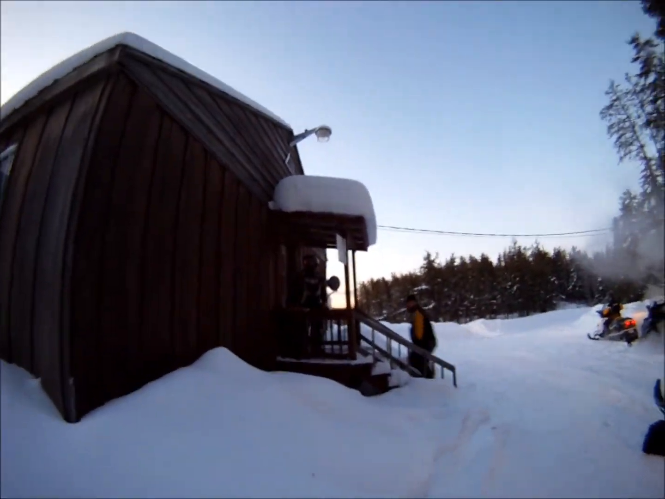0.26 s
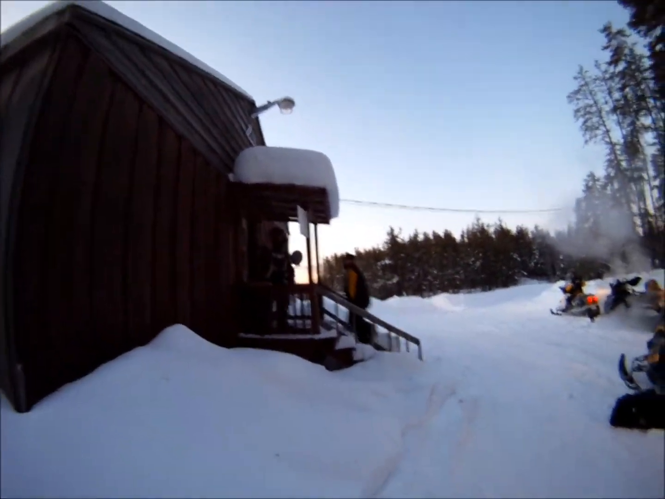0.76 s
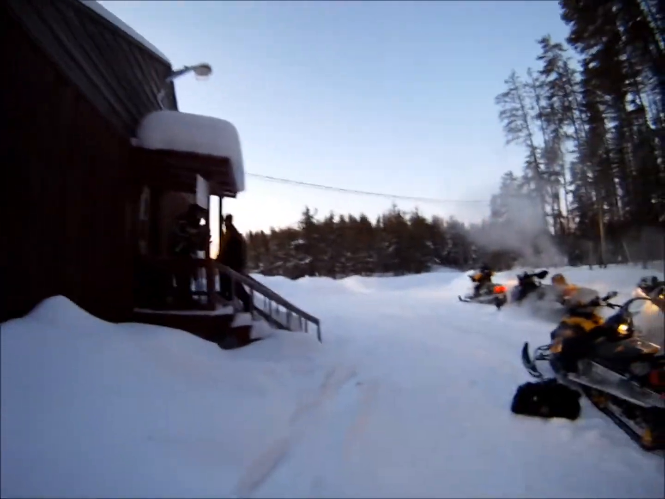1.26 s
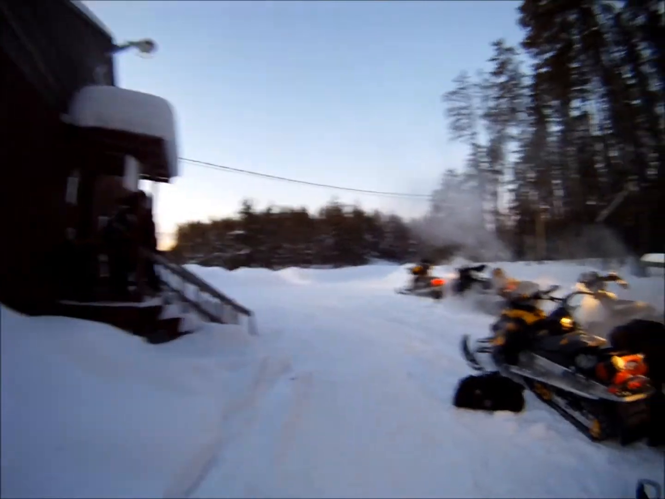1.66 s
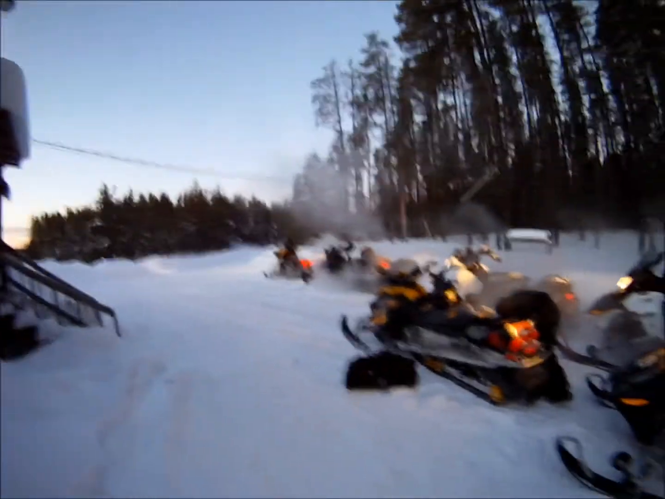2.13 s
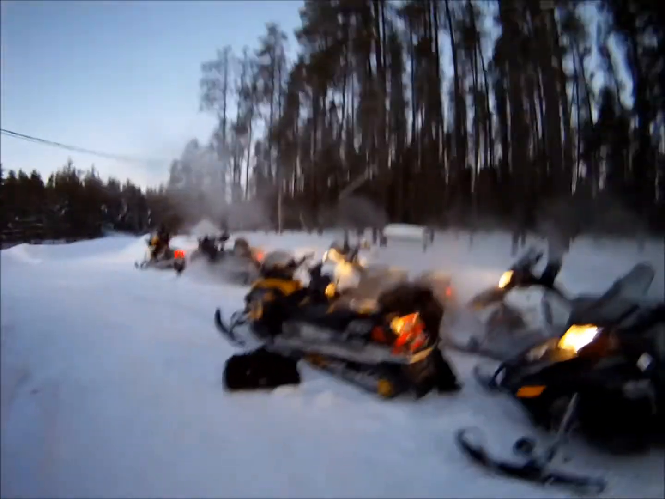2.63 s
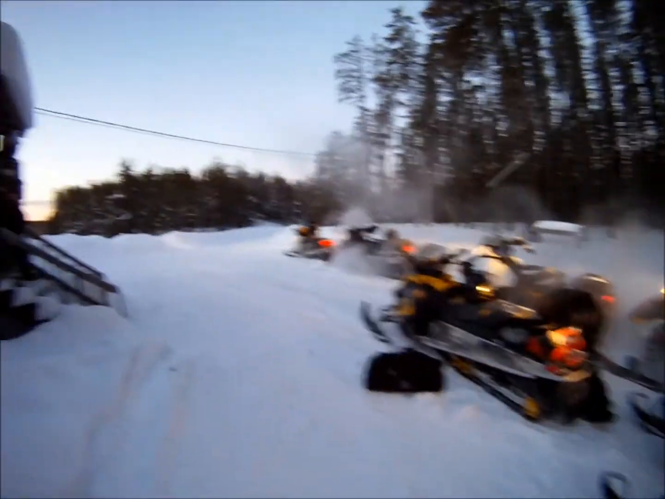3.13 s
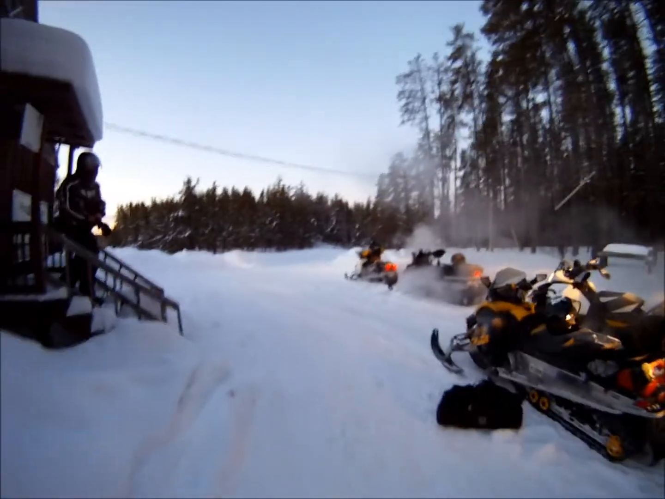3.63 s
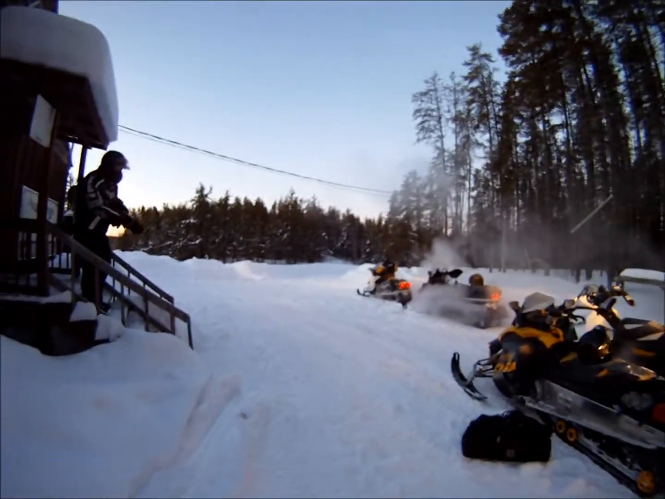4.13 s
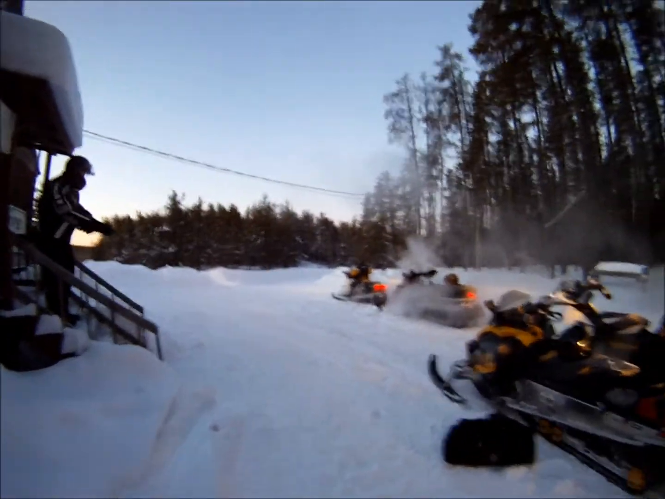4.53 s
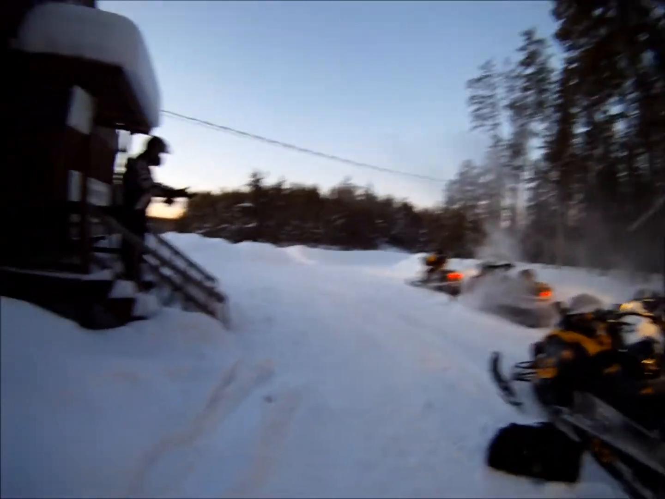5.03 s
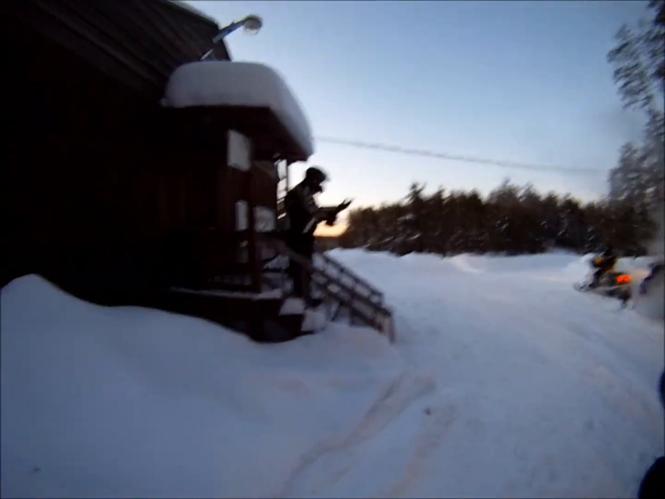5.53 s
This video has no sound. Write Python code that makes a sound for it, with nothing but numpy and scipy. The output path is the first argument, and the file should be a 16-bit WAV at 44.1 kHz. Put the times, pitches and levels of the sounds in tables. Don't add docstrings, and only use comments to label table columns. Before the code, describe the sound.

Several snowmobiles idle in a low uneven throb with fan hiss, while a glove taps, scrapes and sharply knocks the boxed-in camera.

```python
import sys
import numpy as np
from scipy import signal
from scipy.fft import rfft, irfft
from scipy.io import wavfile
from scipy.ndimage import uniform_filter1d

SR = 44100
rng = np.random.default_rng(int(sys.argv[2]) if len(sys.argv) > 2 else 0)


def bounce(signal):
    frames = np.transpose(np.atleast_2d(signal))
    limited = np.clip(frames, -1, 1)
    pcm = np.round(limited * 32767).astype(np.int16)
    wavfile.write(sys.argv[1], SR, pcm)


def gain_from_decibels(decibels):
    exponent = np.asarray(decibels, float) / 20
    return 10 ** exponent


N = 254898

# centre in Hz, width in Hz, level in dB.
CASE_MODES = [(820, 1500, -6.5), (1168, 163, 13.5), (1375, 11, 13), (1581, 144, 15.5), (1900, 830, 6.5),
              (2560, 260, 4), (2760, 380, -2), (3280, 300, -23), (3920, 120, -21), (4100, 160, -44)]
# centre in Hz, width in Hz, level in dB.
WALL_MODES = [(310, 200, -4), (723, 53, 4)]


def level(x, db):
    return x * gain_from_decibels(db) / np.sqrt(np.mean(x ** 2))


def curve(table):
    s, *columns = np.transpose(table)
    return [np.interp(np.arange(N) / SR, s, c) for c in columns]


def fade(span, edge_s):
    t = np.arange(N) / SR
    return np.clip(np.minimum(t - span[0][0], span[-1][0] - t) / edge_s + 0.5, 0, 1)


def colour(x, table):
    hz, db = np.transpose(table)
    f = np.fft.rfftfreq(N, 1 / SR) + 1
    gain_db = np.interp(np.log(f), np.log(hz), db, left=-60, right=-60)
    return irfft(rfft(x) * gain_from_decibels(gain_db), N)


def ring(x, modes):
    out = 0
    for k, (hz, width_hz, db) in enumerate(modes):
        b, a = signal.iirpeak(hz, hz / width_hz, fs=SR)
        out = out + (-1) ** k * gain_from_decibels(db) * signal.lfilter(b, a, x)
    return out


def walk(rate_hz):
    k = int(SR / rate_hz)
    steps = np.repeat(rng.standard_normal(N // k + 1), k)
    return 1.2 * uniform_filter1d(uniform_filter1d(steps, k), k)[:N]


def turns(hz, wander, rate_hz):
    return np.cumsum(hz * (1 + wander * walk(rate_hz))) / SR


def swell_db():
    # peak in seconds, rise above the idle in dB.
    swells = [(.08, 2), (.26, -1), (.6, 4), (1.33, 11), (1.51, 5), (1.66, 4), (1.79, 5), (1.96, 3),
              (2.12, 4), (2.46, 4.5), (2.9, 9.5), (3.11, 8), (3.33, 5.5), (3.43, 4), (3.73, 8.5),
              (3.99, 5.5), (4.3, 8.5), (4.61, 9), (4.86, 9.5), (5.231, 3.5), (5.41, 4.5), (5.72, 9.5)]
    width_s = 0.045
    t = np.arange(N) / SR
    return sum(db * np.exp(-((t - s) / width_s) ** 2) for s, db in swells)


def group_exhaust(cycle, turn):
    # centre in Hz, width in Hz, level in dB.
    silencers = [(66.9, 10.8, 0), (76, 24, -3), (189.4, 51, -10), (231, 69, -18.5), (24, 46, -9)]
    fired = np.floor(2 * cycle + 0.0786 * walk(30)).astype(int)
    fired = np.maximum.accumulate(np.maximum(fired, 0))
    size_db = np.array([0, -7])[fired % 2] + 2.2 * rng.standard_normal(N // 100)[fired]
    pulses = np.diff(fired, prepend=0) * gain_from_decibels(size_db)
    throb = sum(ring(ring(pulses, [mode]), [mode]) for mode in silencers)
    boom = gain_from_decibels(5.0 + 2.3 * walk(15)) * np.sin(4 * np.pi * turn + 0.44 * walk(10))
    drone = gain_from_decibels(-5.5 + 1.4 * walk(7.4)) * np.sin(12 * np.pi * cycle)
    return level(level(throb, 0) + boom + drone, 0)


def near_machine(turn):
    # multiple of the shaft rate, level in dB.
    orders = [(1, -6.5), (3, 1), (4, -6.5), (5, -13.5), (6, -16), (7, -19.5)]
    out = 0
    for k, db in orders:
        out = out + gain_from_decibels(db + 2.0 * walk(11)) * np.sin(2 * np.pi * (k * turn + rng.random()))
    return level(out, 0)


def hiss(cycle, turn):
    # frequency in Hz, level in dB per Hz.
    spectrum = [(150, -28), (250, -11), (553, -16), (591, -17), (631, -12.5), (1090, -4), (1310, -15),
                (1430, -3.5), (2280, -2), (2700, -8), (2930, -13), (3620, -9), (3810, -17), (5520, -15.5),
                (5900, -29.5), (7670, -68), (13000, -120)]
    # centre in Hz, width in Hz, level in dB.
    shroud = [(1177, 123, -6), (1900, 78, 5.5), (2205, 17.6, 10.5), (2682, 61, -1.5), (3128, 33, -2.5),
              (3574, 147, -4), (5000, 260, -35), (5530, 150, -8.5)]
    puff = 1 + 0.12 * np.cos(2 * np.pi * cycle) + 0.1 * np.cos(4 * np.pi * turn)
    broad = 0
    for machine in range(3):
        noise = level(colour(rng.standard_normal(N), spectrum), -6)
        broad = broad + noise * gain_from_decibels(1.6 * walk(13))
    lines = sum(gain_from_decibels(3.7 * walk(16)) * ring(rng.standard_normal(N), [mode]) for mode in shroud)
    return level(puff * (broad + level(lines, -2.5)), 0)


def stroke(s, db, rise_s, fall_s):
    t = np.arange(N) / SR - s
    return gain_from_decibels(db - 20 * np.maximum(-t / rise_s, t / fall_s))


def glove():
    # centre in Hz, width in Hz, level in dB.
    cloth = [(2160, 350, 7), (3770, 350, 1), (4650, 1800, -10)]
    # centre in Hz, width in Hz, level in dB.
    ridges = [(2916, 220, 0), (3684, 260, 1), (4570, 310, -5.5)]
    # time in seconds, pressure in dB.
    scrape = [(1.93, -40), (1.95, -35), (1.968, -27), (2.02, -23.5), (2.068, -18), (2.085, -22.5),
              (2.133, -20.5), (2.142, -41), (2.16, -63)]
    # peak in seconds, level in dB, rise and fall in seconds per 20 dB, wall flex in dB.
    strokes = [(.06, -44, 0.078, 0.2, 1), (.94, -48, 0.047, .35, -14), (1.26, -45, 0.16, 0.15, -22),
               (1.44, -44, .1, 0.18, -23), (1.826, -40.5, 0.087, 0.039, -5.5),
               (2.195, -35, 0.09, 0.091, -8), (2.274, -25.5, 0.05, 0.08, -8.5),
               (2.355, -38.5, 0.049, 0.081, -6.5), (2.448, -32, 0.02, 0.062, -12),
               (2.484, -26, 0.022, 0.067, -17.5), (2.6, -35.5, 0.2, 0.097, -5.5),
               (2.7, -43.5, 0.11, 0.19, -6.5), (2.86, -46.5, 0.12, 0.14, -9),
               (2.982, -40.5, 0.038, 0.056, -6.5), (4.505, -42, .06, 0.052, -4),
               (5.58, -42.5, 0.59, 0.67, -9)]
    scrape_end_s, grains_per_s = 2.3, 7000

    size_db = 1.5 * np.minimum(rng.exponential(size=N), 4)
    grains = rng.standard_normal(N) * (rng.random(N) < grains_per_s / SR) * gain_from_decibels(size_db)
    other_grains = grains[::-1]
    slip = gain_from_decibels(1.5 * walk(200))
    bright = level(slip * ring(ring(grains, CASE_MODES), [(1700, 2260, 0)]), 0)
    bright = bright + level(slip * ring(ring(other_grains, ridges), ridges), -14.0)
    scuff = level(slip * ring(ring(other_grains, cloth), [(2940, 9000, 0)]), 0)
    flex = level(slip * ring(ring(grains, WALL_MODES), [(537, 1800, 0)]), 0)

    pressure = fade(scrape, 0.0098) * gain_from_decibels(curve(scrape)[0])
    out = pressure * (bright + gain_from_decibels(-11.0) * scuff + gain_from_decibels(-20) * flex)
    for s, db, rise_s, fall_s, flex_db in strokes:
        scuff_db = -1.5 if s > scrape_end_s else -7
        rub = bright + gain_from_decibels(scuff_db) * scuff + gain_from_decibels(flex_db - 4.5) * flex
        out = out + stroke(s, db - 3.5, rise_s, fall_s) * rub
    return out


def place(out, s, x):
    i = int(s * SR)
    out[i:i + len(x)] += x


def ticks():
    # time in seconds, level in dB, pitch in Hz.
    taps = [(0.0313, -24, 1620), (0.951, -21, 1600), (1.0544, -30, 1900), (1.1302, -16, 1700),
            (1.1404, -14.5, 1200), (1.2386, -13.5, 1550), (1.3466, -30, 1089), (1.4344, -18, 1170),
            (1.957, -25, 1870), (2.0391, 4.5, 1500), (2.0578, -4.5, 1740), (2.0675, -17, 1690),
            (2.101, -7.5, 1720), (2.1294, -8, 1900), (2.1302, -14, 3630), (2.1347, -9.5, 1400),
            (2.177, -21, 1684), (2.2744, -18.5, 1846), (2.3554, -29, 1920), (2.4477, -22, 1794),
            (2.479, -15, 1930), (2.8898, -29.5, 1720), (2.9618, -28, 2150), (2.9786, -28, 2300),
            (3.0032, -29, 1837), (3.2036, -36, 1697), (3.3441, -37, 1737), (5.5128, -32, 1900),
            (5.577, -30, 1500), (5.6925, -29, 2120)]
    blow, t = np.zeros(N + 4096), np.arange(4096) / SR
    tail = (1 - np.exp(-t / 0.0012)) * np.exp(-t / 0.0026)
    body = (t / 0.00084) ** 2 * np.exp(2 - 2 * t / 0.00059) + 0.21 * tail
    for s, db, hz in taps:
        tone = body * np.sin(2 * np.pi * hz * t)
        snap_db = -19.5 + 0.6 * db
        crack = gain_from_decibels(snap_db) * t / 0.00042 * np.exp(1 - t / 0.00053) * rng.standard_normal(len(t))
        place(blow, s + 0.00042, gain_from_decibels(db + 2.5) * (tone + crack))
    return (blow + 0.16 * ring(blow, CASE_MODES))[:N]


def thuds():
    # time in seconds, level in dB, nominal pitch in Hz (the push sounds at its geometric mean with
    # 700 Hz).
    pushes = [(0.058, -43, 266), (0.292, -39, 299), (0.9678, -42.5, 250), (1.0543, -42, 253),
              (1.1305, -40.5, 709), (1.1412, -30.5, 258), (1.824, -40.5, 333), (1.9194, -43, 797),
              (1.957, -29, 830), (2.0395, -30.5, 438), (2.0591, -34.5, 801), (2.1307, -35, 250),
              (2.2743, -36, 783), (2.3552, -39, 795), (2.479, -45, 562), (2.8895, -40.5, 294.5),
              (3.0032, -47, 250), (3.2036, -42.5, 720), (3.3441, -45.5, 701.4), (4.4868, -42, 784.3),
              (5.5115, -27, 247), (5.5764, -26.5, 354), (5.692, -23.5, 254)]
    push, t = np.zeros(N + 4096), np.arange(4096) / SR
    edge = 0.53 * t / 0.00013 * np.exp(1 - t / 0.00009)
    rebound = 0.55 * t / 0.0016 * np.exp(-t / 0.002) * np.sin(2 * np.pi * 170 * t)
    for s, db, hz in pushes:
        press = np.exp(-t / 0.00066) * np.sin(2 * np.pi * np.sqrt(hz * 700) * t)
        place(push, s + 0.00086, gain_from_decibels(db + 8.5) * (press + edge - rebound))
    return (push + ring(push, CASE_MODES) + 1.45 * ring(push, WALL_MODES[1:]))[:N]


def jolts():
    # time in seconds, level in dB, pitch in Hz.
    bumps = [
        (1.15, -34.5, 33),
        (1.952, -23, 68.5),
        (2.118, -26, 51.5),
    ]
    jolt, t = np.zeros(N + 4096), np.arange(4096) / SR
    for s, db, hz in bumps:
        place(jolt, s, gain_from_decibels(db) * t / 0.014 * np.exp(1 - t / 0.011) * np.sin(2 * np.pi * hz * t))
    return jolt[:N]


def far_machine():
    # time in seconds, firing rate in Hz, level in dB.
    spurts = [
        (4.15, 167.7, -58),
        (4.226, 170.7, -56),
        (4.352, 198.9, -50),
        (4.576, 205.8, -55.5),
        (4.862, 187, -56),
        (4.98, 193.4, -70),
        (5.102, 207.3, -53),
        (5.25, 213, -54.5),
        (5.42, 217, -56),
    ]
    hz, db = curve(spurts)
    tone = np.sin(2 * np.pi * turns(hz, 0.00982, 12))
    return fade(spurts, 0.093) * gain_from_decibels(db + 2.0 + 1.6 * walk(34)) * tone


def wind_rumble():
    # frequency in Hz, level in dB per Hz.
    spectrum = [(8, -27), (14, -8), (22, -7), (36, -21), (50, -2), (60, -5.5), (85, -1), (120, -5),
                (200, -13.5), (300, -32), (500, -46)]
    return level(colour(rng.standard_normal(N), spectrum), -47.5) * gain_from_decibels(3.1 * walk(9))


def scene():
    # time in seconds, shaft rate in turns per second (Hz), level in dB.
    near_idle = [(0.0, 35.75, -43.5), (0.22, 33.16, -46.5), (0.51, 35.53, -50.5), (0.79, 33.22, -47),
                 (1.16, 33.64, -42.5), (1.29, 35.86, -48.5), (1.63, 33.8, -46.5), (2.04, 34.28, -46),
                 (2.17, 33.07, -45), (2.49, 35.7, -47.5), (2.74, 33.9, -43.5), (3.36, 34.85, -46),
                 (3.53, 33.0, -45.5), (3.73, 34.4, -49.5), (5.5, 34.67, -46), (5.78, 34.3, -44)]
    shaft_hz, near_db = curve(near_idle)
    turn = turns(shaft_hz, 0.01134, 6.7)
    cycle = turns(13.0, 0.025, 3.9)
    rise_db = swell_db()
    engines = gain_from_decibels(-42.5 + rise_db) * group_exhaust(cycle, turn)
    engines = engines + gain_from_decibels(near_db + 1.5) * near_machine(turn) + far_machine()
    fans = gain_from_decibels(-46 + 0.092 * rise_db) * hiss(cycle, turn)
    handling = glove() + ticks() + thuds() + jolts()
    return (engines + fans + handling + wind_rumble())[None]


def band_limit(x):
    return signal.sosfilt(signal.butter(12, 16420, fs=SR, output="sos"), x)


def record(dry):
    up, down, hold, back = (40, 147, 4, 160)
    slow = np.clip(signal.resample_poly(dry, up, down, axis=1), -1, 1)
    held = signal.resample_poly(np.repeat(slow, hold, axis=1), down, back, axis=1)
    low_pass = signal.ellip(10, 0.3, 60, 15330, fs=SR, output="sos")
    cut = signal.sosfilt(low_pass, held[:, :N])
    return band_limit(np.clip(cut, -1, 1))


dry = scene()
out = record(dry)
bounce(out)
```